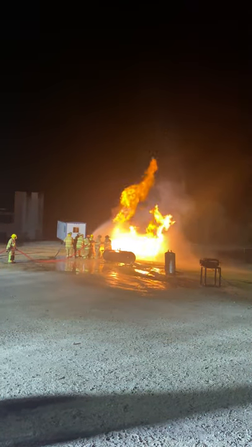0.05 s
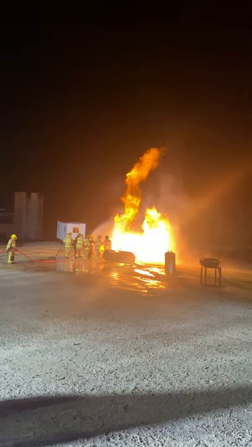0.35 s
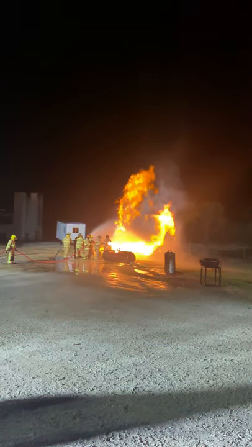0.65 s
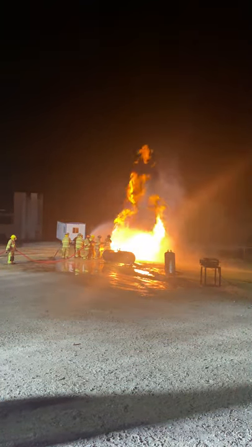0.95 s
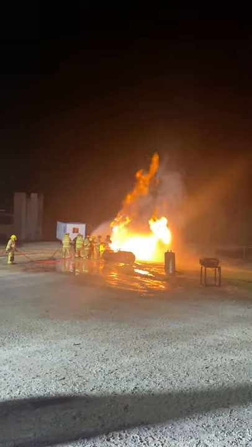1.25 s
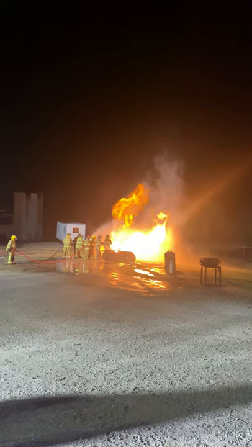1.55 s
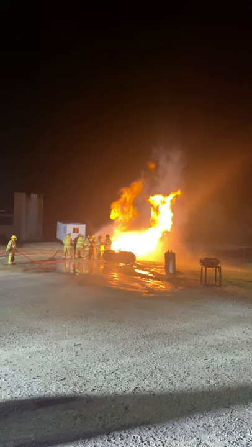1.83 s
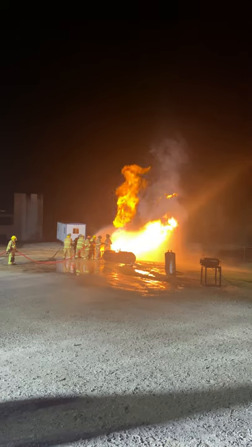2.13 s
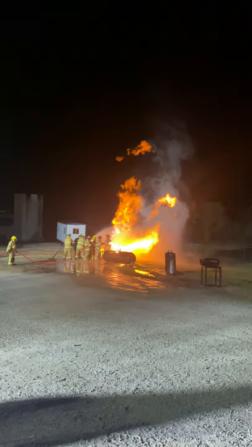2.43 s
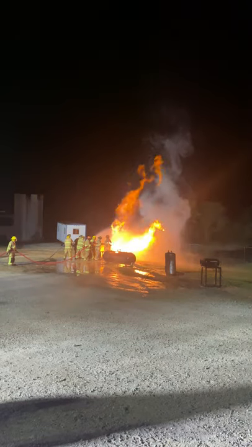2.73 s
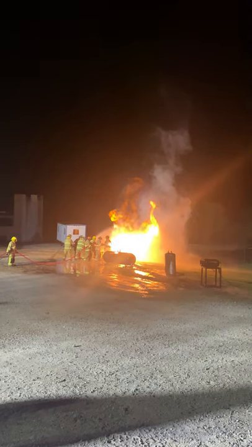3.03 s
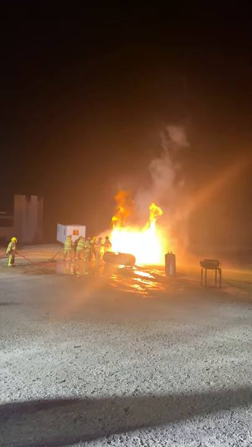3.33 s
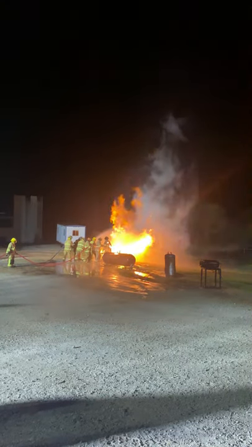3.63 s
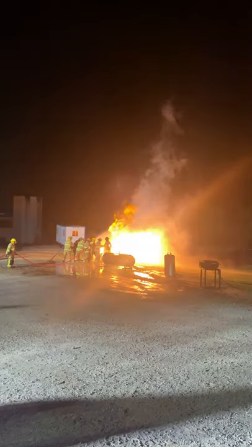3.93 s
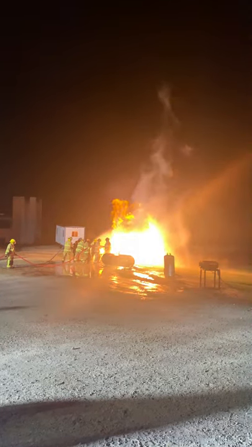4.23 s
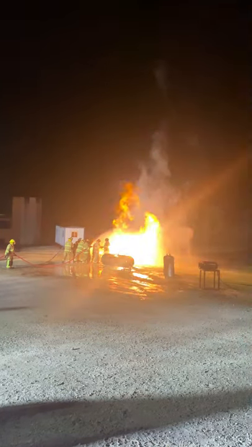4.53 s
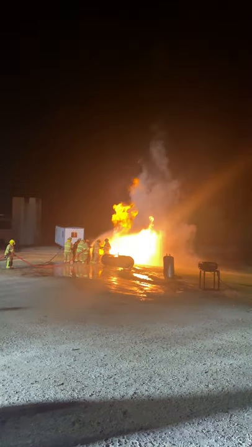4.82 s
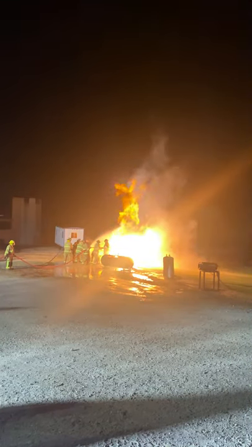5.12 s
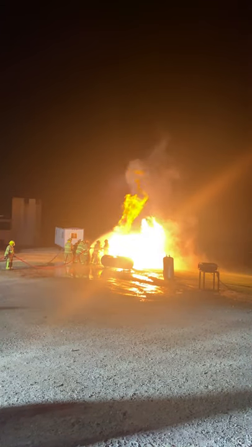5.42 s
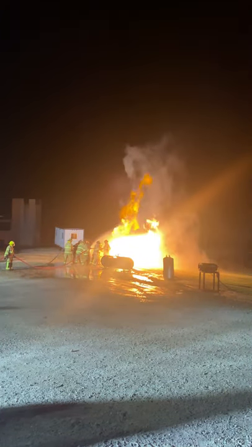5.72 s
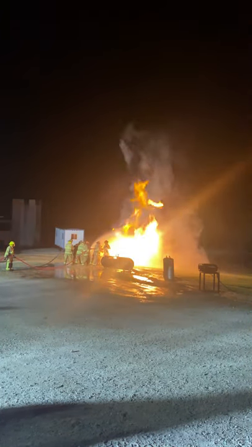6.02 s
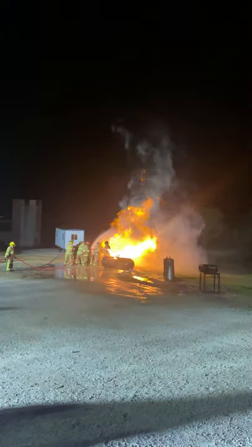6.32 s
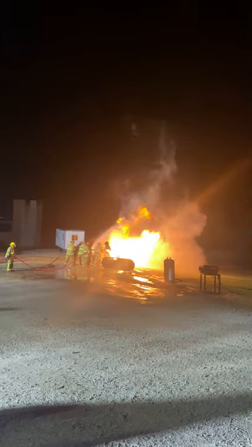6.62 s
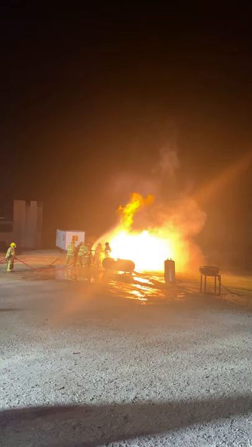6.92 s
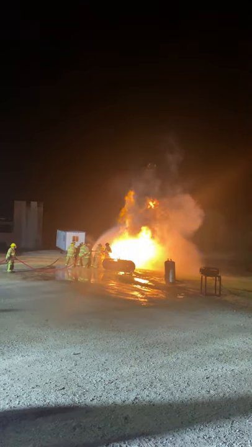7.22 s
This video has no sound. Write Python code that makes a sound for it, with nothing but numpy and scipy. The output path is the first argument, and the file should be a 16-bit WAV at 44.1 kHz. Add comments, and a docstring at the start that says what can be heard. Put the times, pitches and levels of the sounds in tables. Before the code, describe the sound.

A large gas fire burns with a deep, continuous roar, throbbing and puffing as pockets of gas ignite. At the same time a fire hose hisses steadily, its water spattering against a metal tank and sizzling into steam. A pump engine and a second motor drone behind it. Everything carries on without a break, heard from a distance on open ground outdoors.

```python
"""A deep boom and roar: a propane fire on an open training ground at night, under a crew's hissing hose.
The flame ball pumps the air and puffs as pockets of gas ignite; burning gas rushes from the leak.
The water fan spatters, slaps the tank and sizzles into steam, and brief hollow rasps poke through.
Fire and water are shaped noise; behind them a pump engine and a second motor drone as wavering sines.
Two closely spaced microphone ports hear it all from far off."""
import sys
import numpy as np
from scipy import signal
from scipy.fft import rfft, irfft
from scipy.io import wavfile
from scipy.ndimage import uniform_filter1d

SR = 44100
rng = np.random.default_rng(int(sys.argv[2]) if len(sys.argv) > 2 else 0)


def log_audio(samples):
    """Write samples as a 16-bit WAV file to the path given in sys.argv[1]."""
    # one column per channel
    frames = np.atleast_2d(samples).T
    # limit to full scale, then quantise
    limited = np.clip(frames, -1, 1)
    pcm = np.round(limited * 32767).astype(np.int16)
    wavfile.write(sys.argv[1], SR, pcm)


N = 324576

# Fader rides, each played relative to its own mean: t/s, level/dB
BOOM_RIDE = [(0.0, -17), (0.16, -22), (0.33, -15.5), (0.5, -18.5), (0.66, -15.5), (1.0, -18.5),
             (1.15, -18.5), (1.36, -18), (1.98, -17.5), (2.15, -16), (2.5, -18), (2.84, -18), (3.2, -16),
             (3.45, -17.5), (4.2, -17.5), (4.55, -16.5), (5.1, -18.5), (5.7, -18.5), (5.9, -16.5),
             (6.25, -18), (6.46, -19), (6.7, -16.5), (7.36, -19)]   # slow billowing of the whole flame ball
ROAR_RIDE = [(0.0, -24), (0.33, -24.5), (0.56, -23), (0.76, -24.5), (0.98, -24.5), (1.45, -24),
             (1.85, -24.5), (2.22, -22), (2.55, -22.5), (2.7, -22.5), (2.92, -21.5), (3.1, -23.5),
             (3.3, -21), (3.53, -22), (3.74, -21), (3.98, -22.5), (4.28, -23), (4.46, -22), (5.18, -23.5),
             (5.35, -21), (5.54, -24), (6.1, -22.5), (6.33, -24), (6.55, -22.5), (7.36, -20.5)]   # size of the flame
JET_RIDE = [(0.0, -30), (0.4, -30.5), (0.76, -33), (1.18, -30), (1.32, -32), (3.32, -31.5), (4.4, -31.5),
            (4.56, -27.5), (4.66, -34), (4.78, -29), (5.35, -30.8), (5.5, -27.5), (5.64, -31), (5.8, -29),
            (6.08, -29.5), (6.36, -32), (6.82, -30.5), (6.92, -34), (7.36, -30)]   # rush of the burning gas
STEAM_RIDE = [(0.0, -33), (0.4, -32.5), (0.86, -35), (0.92, -35.5), (1.1, -34), (1.28, -34), (1.56, -38),
              (1.8, -32.5), (2.3, -37.5), (2.5, -35.5), (2.64, -37.5), (2.88, -34.5), (3.12, -36.5),
              (3.9, -36), (5.0, -34), (5.52, -33), (6.08, -32.5), (6.22, -35), (6.55, -34), (6.9, -35.5),
              (7.36, -38)]   # water flashing to steam
HOSE_RIDE = [(0.0, -28.5), (0.19, -29), (0.32, -26.5), (0.55, -29), (0.7, -28), (1.28, -28.5),
             (1.42, -30.5), (1.86, -28.5), (2.28, -30.5), (2.95, -30.5), (3.1, -31), (3.36, -32),
             (3.48, -31.5), (4.58, -28.5), (4.68, -30.5), (5.45, -27.5), (5.6, -27), (5.78, -28.5),
             (6.5, -29.5), (6.66, -30.5), (6.98, -29), (7.36, -31)]   # strength of the spray

# Tone colours: f/Hz, relative level/dB
BOOM_EQ = [(30, -28), (40, -18), (50, -2), (63, 3), (80, 1), (105, -0.5), (135, -11), (200, -22.5),
           (400, -76)]   # bass body of the flame ball
ROAR_EQ = [(50, -32), (100, -1.5), (160, 2.5), (200, -2.5), (250, -7), (330, -11), (410, -17), (600, -30.5),
           (1500, -52), (8000, -90)]   # its smaller eddies
RUMBLE_EQ = [(15, -32), (25, -17), (35, 4), (46, 3), (54, 12), (70, -20), (200, -70), (1000, -120)]   # sub-bass of the billows
RUSH_EQ = [(200, -27), (380, -6), (490, 0.5), (650, -0.5), (800, -2.5), (980, -9), (1300, -13), (3000, -55)]   # midrange of the gas jet
SIZZLE_EQ = [(600, -28), (1050, -3), (1350, 0.5), (1650, -3), (1950, -0.5), (2200, -2.5), (2550, -6),
             (2900, -11), (4000, -23), (8000, -48)]   # upper mids of the steam
FAN_EQ = [(1500, -26), (2500, -1.5), (2850, -1.5), (3150, 0.5), (3400, 2), (3650, -1), (3950, 2.5),
          (4250, -1.5), (4550, 2.5), (4850, -3), (5400, -11.5), (7000, -10.5), (12000, -41)]   # bright hiss of the water fan
SPURT_EQ = [(3500, -19), (4750, -8.5), (5200, 0.5), (5600, 2), (6000, 0), (6600, -1), (7300, -8),
            (8500, -8), (12000, -41)]   # ringing hiss of water on the tank
MIST_EQ = [(4000, -30), (6500, -1.5), (8200, 0), (10000, -3), (12000, -6.5), (14000, -22.5), (15500, -7)]   # airy top of the mist

# Gas pockets igniting: t/s, half length/s, boom change/dB, roar change/dB
GAS_PUFFS = [(0.142, 0.02, -6, 5.5), (0.429, 0.01, 9, 2), (0.567, .035, 0.5, 0.5), (.66, .03, 1.5, -2),
             (0.753, 0.021, -1, 2.5), (1.066, 0.013, 9, -2), (1.136, 0.014, 4, 3), (2.256, .04, -0.5, 2),
             (2.43, .012, 6, -2), (2.5, 0.012, 8, 1.5), (2.94, 0.025, 3, 4), (3.603, .024, 6, -0.5),
             (3.71, 0.023, -3, 4), (3.81, 0.0086, 6, 1), (4.143, .045, 2.5, 0), (4.5, 0.017, 7, -1),
             (4.596, 0.024, 1.5, 3), (5.018, 0.029, 2, 1.5), (5.363, 0.038, 1, 1.5), (5.848, 0.015, 7, -6),
             (6.19, 0.016, 4, 0.5), (6.274, 0.0088, 8, -5), (6.74, 0.0092, 7, 3), (6.93, 0.015, 5, -6),
             (7.306, 0.015, 8.5, 0.5)]
# Large billows rolling up: t/s, half length/s, rumble boost/dB
BILLOWS = [(0.33, 0.055, 4.5), (0.767, 0.062, 10.5), (1.078, 0.044, 2), (1.39, 0.069, 7.5),
           (2.2, 0.053, 10), (2.675, 0.072, 10), (3.244, 0.055, 2), (4.55, 0.29, 4), (5.346, .14, 9),
           (6.24, .07, 6), (6.76, .07, 6), (7.15, 0.23, 6)]
# The stream slapping the tank: t/s, half length/s, spurt change/dB, mist change/dB
TANK_SLAPS = [(0.058, 0.048, 3.5, 0.5), (.38, .05, 0.5, -1), (.72, 0.061, 1, 1), (1.112, .025, 0, 1.5),
              (1.697, 0.014, 4.5, 2), (1.777, 0.017, -1, -3), (1.965, 0.01, 3, 4), (2.93, 0.052, 2.5, 4),
              (3.01, 0.032, 3, -1.5), (3.294, 0.034, 6, 3.5), (3.385, 0.021, 3, 3), (3.625, 0.026, 3.5, 6),
              (3.967, .025, 5, 2.5), (4.17, .035, -1, 0), (4.55, 0.017, 5, 1.5), (5.587, 0.025, -1, 4.5),
              (5.694, 0.023, 4.5, 2.5), (6.333, 0.075, 1.5, 3), (6.56, 0.048, 2.5, 4.5)]
# Hollow rasps in the fire and spray: t/s, centre f/Hz, width/Hz, half length/s, crest level/dB
HOLLOW_RASPS = [(0.22, 1380, 160, 0.023, -37), (0.283, 2580, 550, 0.019, -31),
                (0.36, 5400, 900, .05, -34.5), (0.361, 1590, 200, .025, -36),
                (0.395, 2910, 500, 0.024, -36), (0.43, 5400, 500, 0.017, -33),
                (0.497, 2430, 450, 0.021, -30.5), (0.666, 3280, 400, 0.03, -33),
                (0.75, 158, 50, 0.043, -18), (0.936, 1400, 170, 0.025, -31.5), (1.1, 2810, 600, .025, -35),
                (1.11, 5000, 500, .025, -34), (1.151, 620, 110, 0.032, -32),
                (1.245, 1360, 110, 0.021, -32.5), (1.305, 1260, 220, 0.028, -36),
                (1.69, 2710, 450, .018, -33), (1.828, 2400, 350, .02, -35), (3.27, 420, 230, 0.12, -30.5),
                (3.31, 215, 80, 0.047, -22), (3.385, 5600, 500, .025, -34), (3.76, 189, 70, 0.061, -24.5),
                (3.863, 394, 70, 0.046, -36), (4.268, 1776, 220, 0.1, -42), (4.528, 1393, 230, 0.042, -37),
                (5.58, 3920, 1300, .035, -38), (5.658, 997, 300, 0.046, -35.5), (5.9, 2170, 260, .025, -35),
                (5.959, 738, 200, .09, -39), (6.73, 1465, 170, 0.027, -40), (6.81, 475, 60, 0.043, -33)]
# Pump engine harmonics: multiple of the firing rate, rms level/dB
PUMP_HARMONICS = [(1, -37.5), (2, -35), (3, -56), (4, -51), (5, -57), (6, -50), (7, -56)]
# The second motor swelling and sinking: t/s, level offset/dB
MOTOR_SWELL = [(0.0, -1.5), (0.75, 1.5), (1.3, -7), (2.05, 1.5), (2.7, -5), (4.2, -2), (5.0, 4), (5.8, 0),
               (6.7, 2.5), (7.36, 3)]
# Stereo image at the two ports: f/Hz, left minus right/dB, left lead/rad, coherence (0-1)
PORT_IMAGE = [(100, -0.3, 0.03, 0.98), (260, -1.8, -0.01, 0.99), (400, -0.3, 0.85, 0.84),
              (685, 5.8, 0.94, 0.84), (980, 2.5, 1.23, 0.96), (1150, 7.5, 1.5, 0.63),
              (1400, 10.5, 0.5, 0.77), (1710, 4.5, 0.55, 0.7), (2050, 6.5, 1.32, 0.57),
              (2400, 1.5, 2, 0.81), (2950, 0, 3.5, 0.79), (3410, 4.5, 6, 0.79), (3920, 0.5, 6.95, 0.72),
              (4350, 6, 7.85, 0.4), (4620, -1.5, 8.0, 0.46), (4870, -3, 8, 0.6), (5040, -2.5, 6.7, 0.93),
              (5600, -2, 7, 0.98), (6110, 1.5, 8.0, 0.76), (7080, -1.7, 9.5, 1), (8450, 1.5, 10.5, 0.94),
              (10440, -0.5, 13, 1), (12760, -0.1, 15, 1)]

# Base levels, before rides, swells and flutter
BOOM_DB, ROAR_DB, RUMBLE_DB = -18, -21.5, -34.5
RUSH_DB, SIZZLE_DB = -32, -34
FAN_DB, SPURT_DB, MIST_DB = -33, -35, -37.5
HUM_DB, WHINE_DB = -24.5, -33

THROB_DB, THROB_HZ = 1.64, 35   # the flame ball pulses unevenly
SPUTTER_DB, SPUTTER_HZ = 0.7, 12   # the stream breaks up, shaking all of its hiss together
JET_FOLLOWS_ROAR, FAN_FOLLOWS_MIST = 0.13, 0.24   # shares of the roar's ride and of the mist's slaps
RASP_SAG_OCTAVES_PER_S = 1.3
PUMP_FIRING_HZ, MOTOR_HUM_HZ, MOTOR_WHINE_HZ = 124.26, 90.8, 265.8
BOOM_LOW_CUT_HZ, HIGH_CUT_HZ = 48, 15150


def flame_ball():
    """The flame ball pumps the air slowly and puffs; its smaller eddies roar an octave above."""
    thump_db, flare_db = paired_swells(GAS_PUFFS)
    boom_db = BOOM_DB + ride(BOOM_RIDE) + thump_db + THROB_DB * drift(THROB_HZ)
    roar_db = ROAR_DB + ride(ROAR_RIDE) + flare_db + 0.83 * drift(rate_hz=9.8)
    # the fuel feed is steady, so the flame rolls on without long lulls
    boom = levelled(coloured(rng.standard_normal((2, N)), BOOM_EQ), samples=2600)
    roar = levelled(turbulence(ROAR_EQ, flutter_db=1.5, flutter_hz=5.7), samples=3000)
    low_cut = signal.butter(4, BOOM_LOW_CUT_HZ, "high", fs=SR, output="sos")
    return signal.sosfilt(low_cut, from_db(boom_db) * boom) + from_db(roar_db) * roar


def billows():
    """Each large billow that rolls up from the fire swells the deepest rumble."""
    surge_db = sum(db * swell(at_s, half_s) for at_s, half_s, db in BILLOWS)
    rumble = levelled(coloured(rng.standard_normal((2, N)), RUMBLE_EQ), samples=3000)
    return from_db(RUMBLE_DB + surge_db) * rumble


def gas_jet():
    """Gas rushes out and burns in surges; water that meets it sizzles."""
    rush_db = RUSH_DB + ride(JET_RIDE) + JET_FOLLOWS_ROAR * ride(ROAR_RIDE) + 0.64 * drift(rate_hz=14)
    sizzle_db = SIZZLE_DB + ride(STEAM_RIDE) + 0.92 * drift(rate_hz=8.9)
    rush = levelled(turbulence(RUSH_EQ, flutter_db=1.5, flutter_hz=17), samples=2600)
    sizzle = levelled(turbulence(SIZZLE_EQ, flutter_db=1.7, flutter_hz=14), samples=1800)
    return from_db(rush_db) * rush + from_db(sizzle_db) * sizzle


def hose():
    """The water fan hisses, spurts against the tank and falls back as mist and spatter."""
    flow_db = ride(HOSE_RIDE) + SPUTTER_DB * drift(SPUTTER_HZ)
    ring_db, splash_db = paired_swells(TANK_SLAPS)
    spatter = drops(per_s=3000, spread_db=1.0)
    fan = turbulence(FAN_EQ, flutter_db=1.55, flutter_hz=18) + from_db(-7.5) * coloured(spatter, FAN_EQ)
    spurt = turbulence(SPURT_EQ, flutter_db=1.5, flutter_hz=25)
    spurt += from_db(-9.5) * coloured(spatter, SPURT_EQ)
    mist = turbulence(MIST_EQ, flutter_db=1.0, flutter_hz=14)
    mist += from_db(-9.5) * coloured(spatter, MIST_EQ)
    return from_db(flow_db) * (from_db(FAN_DB + FAN_FOLLOWS_MIST * splash_db) * fan
                               + from_db(SPURT_DB + ring_db) * spurt
                               + from_db(MIST_DB + splash_db) * mist)


def drops(per_s, spread_db):
    """Drops of uneven size click on steel and wet asphalt at random moments."""
    size_db = spread_db * np.minimum(rng.exponential(1, (2, N)), 4)
    polarity = rng.choice([-1, 1], (2, N))
    hits = rng.random((2, N)) < per_s / SR
    return from_db(size_db) * polarity * hits


def rasps():
    """Brief swells of narrow noise stand out of the fire and spray, sinking in pitch as they pass."""
    out, t = np.zeros((2, N)), np.arange(N) / SR
    for at_s, hz, width_hz, half_s, level_db in HOLLOW_RASPS:
        near = np.abs(t - at_s) < .3
        from_crest_s = t[near] - at_s
        phase = 2 * np.pi * np.cumsum(hz * 2 ** (-RASP_SAG_OCTAVES_PER_S * from_crest_s)) / SR
        # low-passed noise on a gliding carrier makes a narrow band
        low_pass = signal.butter(2, width_hz / 2, fs=SR, output="sos")
        slow_noise = signal.sosfilt(low_pass, rng.standard_normal((2, 2, SR)))[..., -near.sum():]
        band = levelled(slow_noise[0] * np.cos(phase) + slow_noise[1] * np.sin(phase), samples=1500)
        out[:, near] += from_db(level_db) * band * np.exp(-.5 * (from_crest_s / half_s) ** 2)
    return out


def engines():
    """Both run at governed speed: the pump with stacked firing harmonics, the motor with hum and whine."""
    pump_phase, motor_phase = shaft_phase(hunt=0.00057), shaft_phase(hunt=0.001116)
    motor_db, = in_time(MOTOR_SWELL)
    pump = sum(engine_tone(order * PUMP_FIRING_HZ * pump_phase, db, waver_db=1.0)
               for order, db in PUMP_HARMONICS)
    hum = engine_tone(MOTOR_HUM_HZ * motor_phase, HUM_DB + motor_db, waver_db=2.0)
    whine = engine_tone(MOTOR_WHINE_HZ * motor_phase, WHINE_DB + motor_db, waver_db=1.5)
    return pump + hum + whine


def shaft_phase(hunt):
    """Phase of a one-hertz rotation whose speed hunts by a small share."""
    return 2 * np.pi * np.cumsum(1 + hunt * drift(rate_hz=0.614)) / SR


def engine_tone(phase, level_db, waver_db):
    """One partial, its level wavering on the way through hot, moving air."""
    amplitude = np.sqrt(2) * from_db(level_db + waver_db * drift(rate_hz=1.7))
    return amplitude * np.sin(phase + rng.uniform(0, 2 * np.pi))


def microphone_ports(direct, scattered):
    """Direct sound reaches the left port first; scattered sound widens the image."""
    balance_db, lead_rad, coherence = in_frequency(PORT_IMAGE)
    # long waves are alike at both ports, so the width closes below 260 Hz
    bass_taper = np.minimum(np.arange(N // 2 + 1) * SR / N / 260, 1) ** 2
    side_share = bass_taper * np.clip(1 - coherence, .002, 1) / 2
    mid = np.sqrt(1 - side_share) * rfft(direct)
    side = np.sqrt(side_share) * rfft(scattered)
    balance = from_db(balance_db)
    left = (mid + side) * balance
    right = (mid - side) * np.exp(-1j * lead_rad)
    return irfft(np.array([left, right]) * np.sqrt(2 / (1 + balance ** 2)), N)


def turbulence(eq, flutter_db, flutter_hz):
    """Flow noise, direct and scattered; five interleaved sets of third-octaves flutter independently."""
    third_octave = np.round(3 * np.log2(np.maximum(np.arange(N // 2 + 1), 1))).astype(int)
    white = rfft(rng.standard_normal((2, N)))
    bands = [irfft(white * (third_octave % 5 == k), N) * from_db(flutter_db * drift(flutter_hz))
             for k in range(5)]
    return coloured(sum(bands), eq)


def coloured(x, eq):
    """Shape a signal with an EQ curve; rms 1."""
    level_db, = in_frequency(eq)
    return unit_rms(irfft(rfft(x) * from_db(level_db), N))


def levelled(x, samples):
    """Hold the power near 1 over a window of so many samples."""
    power = uniform_filter1d(uniform_filter1d(x ** 2, samples), samples)
    return x / np.sqrt(power + 1e-12)


def drift(rate_hz):
    """A smooth random modulator of rms 1, rolling off above rate_hz."""
    count = N // 64
    hz = np.arange(count // 2 + 1) * SR / N
    slow = irfft(rfft(rng.standard_normal(count)) / (1 + (hz / rate_hz) ** 2), count)
    return np.interp(np.arange(N) * count / N, np.arange(count), unit_rms(slow))


def swell(at_s, half_s):
    """A bell-shaped rise and fall of height 1 around a moment."""
    return np.exp(-.5 * np.minimum(((np.arange(N) / SR - at_s) / half_s) ** 2, 100))


def paired_swells(events):
    """Two dB envelopes: each event lifts or ducks two layers at once."""
    return sum(np.outer(changes_db, swell(at_s, half_s)) for at_s, half_s, *changes_db in events)


def ride(curve):
    """A fader ride in dB around its own mean."""
    level_db, = in_time(curve)
    return level_db - level_db.mean()


def in_time(rows):
    """Each column of a curve, at every sample."""
    times, *columns = np.transpose(rows)
    return [np.interp(np.arange(N) / SR, times, column) for column in columns]


def in_frequency(rows):
    """Each column of a spectrum, at every Fourier bin."""
    hz, *columns = np.transpose(rows)
    bin_hz = np.maximum(np.arange(N // 2 + 1) * SR / N, 1)
    return [np.interp(np.log(bin_hz), np.log(hz), column) for column in columns]


def from_db(db):
    """Decibels to gain."""
    return 10 ** (np.asarray(db) / 20)


def unit_rms(x):
    """Scale to unit power."""
    return x / np.sqrt(np.mean(x ** 2) + 1e-20)


def scene():
    """Fire and water arrive both direct and scattered; the engines arrive direct only."""
    direct, scattered = flame_ball() + billows() + gas_jet() + hose() + rasps()
    return microphone_ports(direct + engines(), scattered)


def record(dry):
    """A steep high cut takes off the very top of the hiss."""
    high_cut = signal.ellip(10, .1, 80, HIGH_CUT_HZ, fs=SR, output="sos")
    return signal.sosfilt(high_cut, dry)


dry = scene()
out = record(dry)
log_audio(out)
```